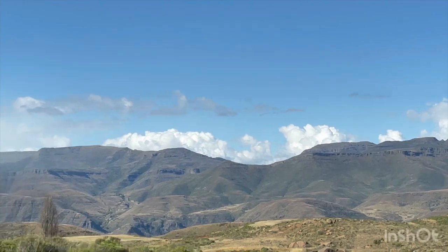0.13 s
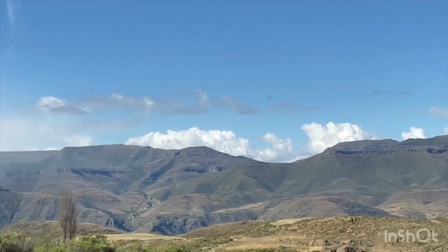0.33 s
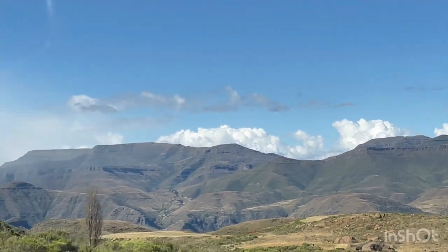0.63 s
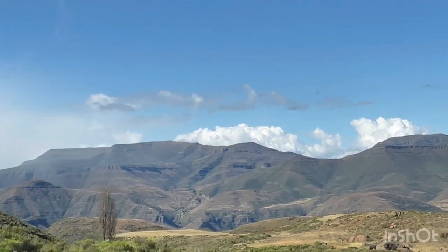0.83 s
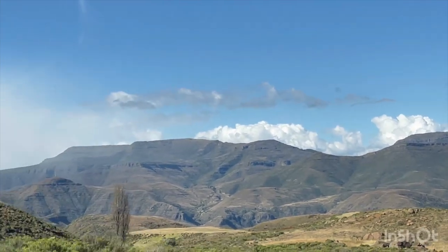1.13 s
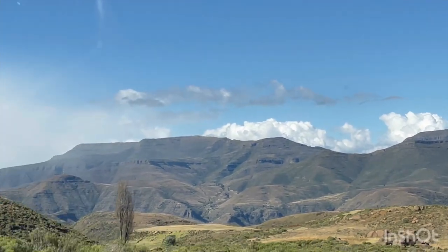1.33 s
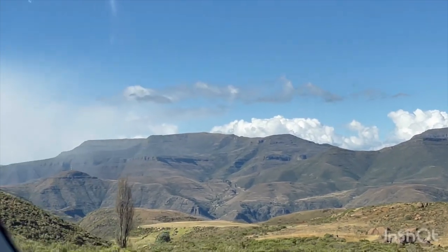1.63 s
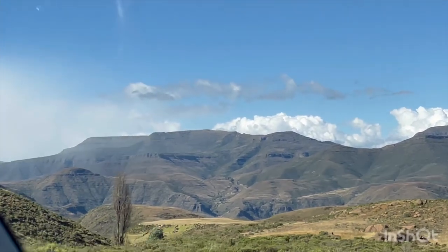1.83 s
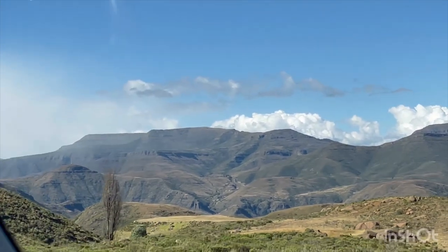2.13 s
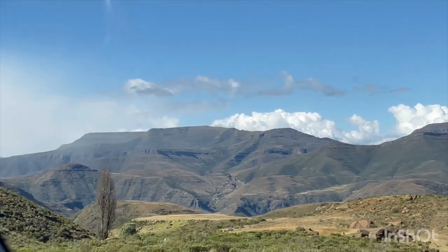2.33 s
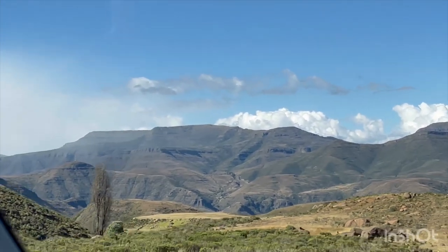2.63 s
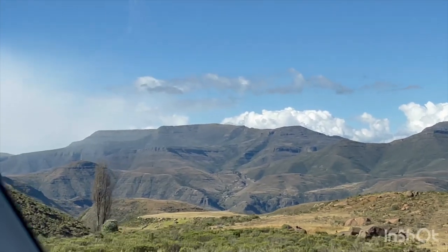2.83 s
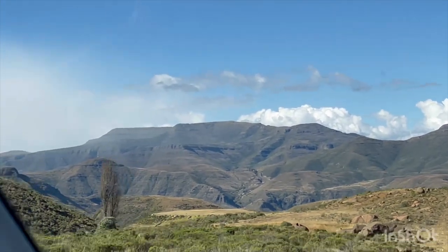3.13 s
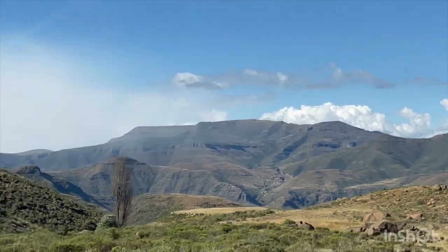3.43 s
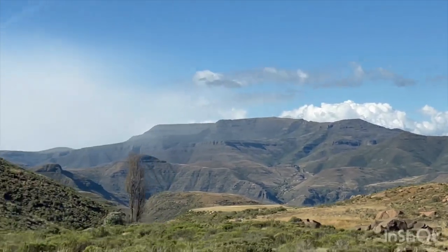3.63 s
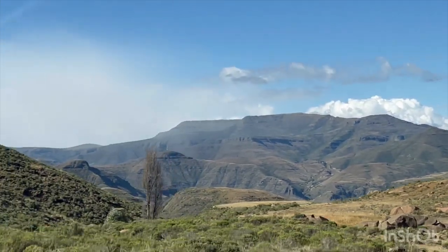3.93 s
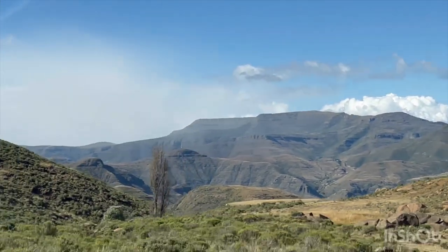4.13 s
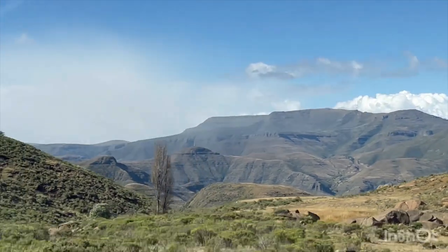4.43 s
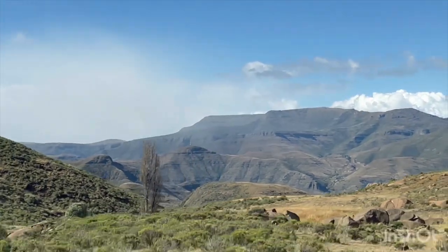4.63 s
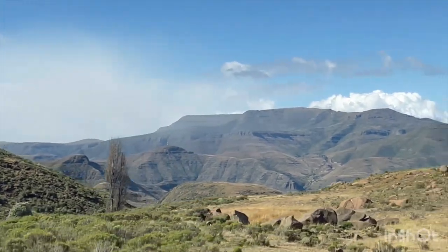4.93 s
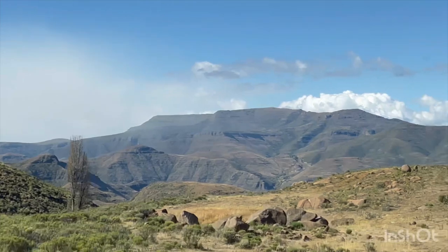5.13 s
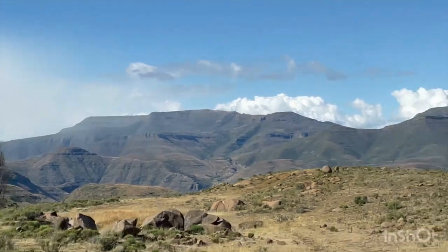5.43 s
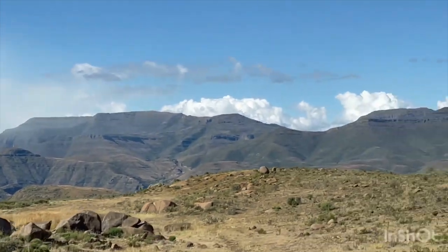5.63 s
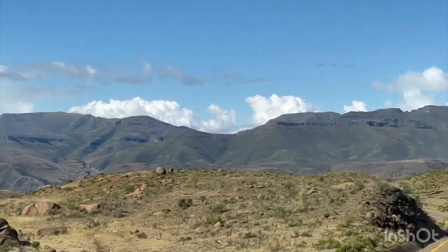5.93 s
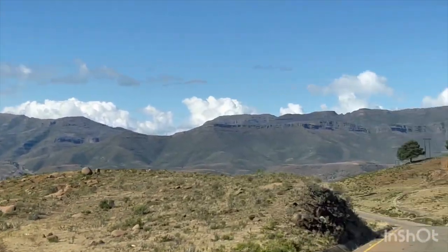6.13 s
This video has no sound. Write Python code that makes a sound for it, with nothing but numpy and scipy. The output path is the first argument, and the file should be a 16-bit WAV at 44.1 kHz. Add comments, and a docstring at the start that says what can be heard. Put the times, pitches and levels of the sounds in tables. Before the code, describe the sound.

Deep throbbing boom, tyre rumble and low droning body panels inside a moving car, with faint cloth rustle early and rougher road towards the end.

```python
"""Inside a car rolling on a tarred road, near a phone. From the start the cabin booms in throbs, body panels and
tyres drone as wandering sines, and tyre rumble and roar with an engine beat come through as shaped noise.
Noise hisses at the window seals beside a thin whine; cloth rustles in a bright and a dull hiss that stop at
2.1 s, and the seat creaks early on. Two ticks ring the phone case after 1.3 s, then come short soft puffs of
noise, each in one band; at 4.2 s something squeaks once. The road turns coarser and louder towards the end."""
import sys
import numpy as np
from scipy import signal
from scipy.fft import rfft, irfft, next_fast_len
from scipy.io import wavfile
from scipy.ndimage import uniform_filter1d, map_coordinates

SR = 44100
rng = np.random.default_rng(int(sys.argv[2]) if len(sys.argv) > 2 else 0)


def file_out(sig):
    """Save sig as 16-bit WAV at sys.argv[1]."""
    # one column per channel
    cols = np.atleast_2d(sig).T
    # limit, then scale
    lim = np.clip(cols, -1, 1)
    pcm = np.round(lim * 32767).astype(np.int16)
    wavfile.write(sys.argv[1], SR, pcm)


N = 276507
TIME = np.arange(N) / SR  # s

# Drive of the road: t/s, rumble level/dB, roar level/dB,
# then ringing of floor/dB, roof/dB, tyre cavity/dB, doors/dB, dash/dB
ROAD_DRIVE = [(0, -30, -44.5, -33, -39, -38.5, -59, -64), (.4, -30, -45, -35, -39, -39.5, -44.5, -62),
              (.93, -30.5, -45, -38, -38, -58, -42, -57.5), (1.45, -29, -44, -27, -38.5, -45.5, -46, -54),
              (1.8, -30, -44.5, -52.5, -38.5, -43, -49.5, -61),
              (2.02, -32.5, -44.5, -48, -38, -43.5, -49, -58), (2.3, -31.5, -46, -52, -36, -48.5, -44, -54),
              (2.75, -31, -46, -43.5, -34.5, -40.5, -48, -63.5),
              (3.2, -29, -46, -32.5, -37, -42, -53.5, -48), (3.55, -30, -46, -33, -35.5, -43.5, -45.5, -57),
              (3.78, -32, -45, -39, -35.5, -35, -50, -50.5),
              (4.05, -29.5, -45, -41.5, -37.5, -43, -42.5, -53),
              (4.22, -29.5, -45.5, -37.5, -38, -41, -32.5, -48.5),
              (4.35, -30, -45, -29.5, -36, -33, -39.5, -47),
              (4.52, -27.5, -45.5, -47.5, -43.5, -48, -46.5, -51.5),
              (4.7, -29, -45, -39, -40.5, -33.5, -39.5, -50),
              (4.9, -24, -43.5, -32, -37, -41.5, -38.5, -49),
              (5.2, -27.5, -43.5, -30.5, -33.5, -36.5, -34.5, -55),
              (5.33, -27.5, -44, -34.5, -32, -27.5, -30, -55.5),
              (5.47, -27, -44.5, -33.5, -31, -41, -37, -51),
              (5.65, -26.5, -44.5, -32, -34.5, -33, -33.5, -54),
              (5.85, -27, -45, -33.5, -33, -37, -43.5, -45.5), (6.05, -26, -44, -37, -39, -33, -41.5, -48),
              (6.27, -28, -45, -30.5, -30.5, -36.5, -49, -44.5)]


def amp(db):
    """dB to gain."""
    return 10 ** (np.asarray(db) / 20)


def unit(x):
    """Scaled to rms 1."""
    return x / np.sqrt(np.mean(x ** 2) + 1e-20)


def along(points, hz):
    """Values between (f/Hz, value) points, read on a log frequency axis."""
    f, v = np.transpose(points)
    return np.interp(np.log(hz + 1), np.log(f + 1), v)


def curves(rows):
    """One value per sample for each column after the time."""
    s, *columns = np.transpose(rows)
    return [np.interp(TIME, s, column) for column in columns]


def wobble(rate):
    """A smooth random curve, rate knots a second."""
    knots = rng.standard_normal(int(N * rate / SR) + 4)
    return map_coordinates(knots, [np.arange(N) * rate / SR])


def swell(s, db, length, peaky=0.58, early=1):
    """A rounded gain that opens at s and closes after length; early under 1 brings its top forward."""
    progress = np.clip((TIME - s) / length, 0, 1)
    return amp(db) * np.sin(np.pi * progress ** early).clip(0) ** peaky


def plateau(s, length, db, edge_s):
    """A gain that rises around s, holds and falls around s + length."""
    t = TIME - s
    edges = np.clip(np.minimum(t, length - t) / edge_s + .5, 0, 1)
    return amp(db) * np.sin(np.pi / 2 * edges) ** 2


def tone(hz):
    """A sine of rms 1 on a moving pitch, from a random phase."""
    return np.sqrt(2) * np.sin(2 * np.pi * (np.cumsum(hz) / SR + rng.random()))


def filtered(x, response, mirror="odd"):
    """x times a response of frequency; mirrored ends keep the edges from ringing."""
    pad = SR // 4
    x = np.pad(x, [(0, 0)] * (x.ndim - 1) + [(pad, pad)], "reflect", reflect_type=mirror)
    index = np.arange(N + 2 * pad)
    x = x * np.clip(np.minimum(index, index[::-1]) / pad, 0, 1)  # fades only the mirrored ends
    m = next_fast_len(N + 2 * pad)
    return irfft(rfft(x, m) * response(np.fft.rfftfreq(m, 1 / SR)), m)[..., pad:pad + N]


def resonant(x, modes, order=1):
    """x through (f/Hz, width/Hz, level/dB) resonances; order 2 deepens the valleys between them."""
    def response(f):
        total = 0
        for k, (centre, width, db) in enumerate(modes):
            damping = 1j * f * width
            peak = damping / (centre * centre - f * f + damping)
            total = total + (-1) ** k * amp(db) * peak ** order
        return total
    return filtered(x, response)


def patchy(patchy_db, size=512, axis=(6, 10)):
    """White noise with patches of random gain; a longer frame size makes them narrower in pitch and slower."""
    z = signal.stft(rng.standard_normal(N + size), nperseg=size)[2]
    field = uniform_filter1d(rng.standard_normal(z.shape), size=axis[0], axis=0)
    field = uniform_filter1d(field, size=axis[1], axis=1)
    return signal.istft(z * amp(patchy_db * unit(field)), nperseg=size)[1][:N]


def rush(source, spectrum):
    """A source coloured by a spectrum, rms 1."""
    return unit(filtered(source, lambda hz: amp(along(spectrum, hz)), mirror="even"))


def wide(make):
    """Two draws of a sound, the second opposite in the channels: a field from all around."""
    # Stereo spread throughout: f/Hz, side minus mid/dB
    width = [(40, -34.5), (60, -23), (110, -20), (200, -11), (380, -10.5), (700, -5), (1300, -6.5),
             (1800, -10.5), (2150, -43.5), (9000, -55)]
    # Extra side noise at 2.5-5 kHz from 2.43 s: f/Hz, side minus mid/dB
    extra_side = [(2000, -47), (2500, -25), (2900, -11.5), (4200, -6.5), (5000, -13), (5400, -63)]
    extra_start_s = 2.43
    mid, other = make(), make()
    extra_gain = np.clip((TIME - extra_start_s) / .08, 0, 1)
    side = filtered(other, lambda hz: amp(along(width, hz)))
    side = side + extra_gain * filtered(other, lambda hz: amp(along(extra_side, hz)))
    return np.array([mid + side, mid - side])


def boom():
    """The cabin's lowest air mode throbs: a sine of wandering pitch swells again and again over a softer boom."""
    # Throbs of the air mode: start t/s, level/dB before random sway, length/s, mean f/Hz at mid-throb
    throb_rows = [(-.02, -22, 0.077, 42.47), (0.169, -21.5, .12, 45.53), (0.269, -24.5, 0.11, 46.12),
                  (0.449, -16.5, 0.39, 45.54), (0.86, -24, .11, 49.71), (0.981, -24.5, 0.09, 49.45),
                  (1.158, -20.5, 0.16, 47.55), (1.297, -16.5, .14, 47.15), (1.446, -16, .22, 46.93),
                  (1.636, -23, 0.23, 46.08), (1.86, -21.5, 0.12, 48.17), (2.071, -23.5, .125, 46.6),
                  (2.209, -20, .11, 46.43), (2.316, -22.5, .25, 46.24), (2.586, -24.5, 0.16, 46.47),
                  (2.704, -17, .11, 45.93), (2.812, -22.5, .16, 45.54), (2.96, -27, .09, 46.04),
                  (3.054, -17.5, 0.3, 45.27), (3.383, -19, .17, 42.23), (3.631, -18, 0.11, 46.29),
                  (3.745, -19, 0.29, 45.83), (4.004, -27.5, 0.089, 47.81), (4.13, -20.5, 0.17, 46.96),
                  (4.298, -20, 0.34, 43.67), (4.576, -13.5, 0.095, 44.55), (4.695, -17.5, 0.32, 45.1),
                  (4.985, -22, 0.065, 45.12), (5.056, -14.5, 0.23, 44.46), (5.317, -22.5, 0.18, 45.6),
                  (5.401, -19, .16, 48.06), (5.561, -19.5, 0.099, 50.2), (5.665, -19.5, 0.071, 48.6),
                  (5.773, -20.5, 0.15, 45.8), (5.883, -16, 0.21, 47), (6.115, -24, .07, 47),
                  (6.216, -19.5, 0.057, 43.9)]
    boom_hz, boom_db, sway_db = 46.04, -37, 2.5  # the boom under the throbs and its random sway
    pitch, = curves([(s + length / 2, hz) for s, db, length, hz in throb_rows])
    throbs = np.zeros(N)
    for k, (s, db, length, hz) in enumerate(throb_rows):
        # each swings against the last, as beats do
        throbs += (-1) ** k * swell(s, db, length, peaky=0.6, early=0.77)
    between = amp(boom_db + sway_db * wobble(19)) * tone(boom_hz + 5 * wobble(24))
    return between + throbs * amp(0.83 * wobble(33)) * tone(pitch + 1.53 * wobble(16))


def panels():
    """Road shake rings the body and tyre modes as sines of wandering pitch and level; bumps lift floor and roof."""
    # Modes grouped as floor, roof, tyre cavity (split in two by the load), doors, dash:
    # f/Hz, random wander/Hz, level/dB relative to the group's ringing
    panel_modes = [
        [(79.77, 2.52, -2.5)],
        [(116.5, 2.2, -1.5)],
        [(190, 2, -2), (203.2, 2.26, -4.5)],
        [(241.7, 5, -3.5)],
        [(428, 12, -3), (470, 12, -6)],
    ]
    # Rough patches: start t/s, length/s, floor level/dB, roof level/dB
    bumps = [(1.303, 0.092, -30.5, -30), (1.776, 0.074, -33, -30), (3.043, 0.15, -27.5, -29),
             (3.563, 0.042, -23, -31), (3.738, 0.16, -39, -27), (3.895, 0.071, -27, -31),
             (4.024, 0.11, -25.5, -43), (4.875, 0.074, -21, -25.5), (4.992, 0.15, -22, -26.5),
             (5.347, 0.15, -29, -28), (5.525, 0.13, -24, -25.5), (5.71, .16, -19.5, -25),
             (5.965, 0.073, -29, -24.5), (6.088, 0.11, -26, -28.5)]
    bump_edge_s, sway_db = 0.029, 1.5
    _, _, floor_db, roof_db, *others_db = curves(ROAD_DRIVE)
    floor, roof = amp(floor_db), amp(roof_db)
    floor_bumps, roof_bumps = np.zeros(N), np.zeros(N)
    for s, length, floor_bump_db, roof_bump_db in bumps:
        floor_bumps += plateau(s, length, floor_bump_db, bump_edge_s)
        roof_bumps += plateau(s, length, roof_bump_db, bump_edge_s)
    gains = [np.maximum(floor, floor_bumps), np.maximum(roof, roof_bumps), *amp(others_db)]
    ringing = np.zeros(N)
    for modes, gain in zip(panel_modes, gains):
        for hz, wander_hz, db in modes:
            sway = sway_db * (wobble(9) + wobble(16))
            ringing += gain * amp(db + sway) * tone(hz + wander_hz * wobble(14))
    return ringing


def drone():
    """The road keeps the cabin air and the panels ringing; the heavy body passes no treble."""
    body_top_hz = 650
    return filtered(boom() + panels(), lambda hz: 1 / (1 + (hz / body_top_hz) ** 8))


def road():
    """Tyres rumble through the floor as patchy noise; the roar above carries the engine's firing beat."""
    # Rumble colour on smooth tar, then on coarser tar: f/Hz, relative level/dB
    rumble_smooth = [(15, -62.5), (24, -8), (34, -12), (46, -10.5), (60, 7.5), (70, 2), (98, 2.5),
                     (130, -1.5), (160, -5.5), (178, -7.5), (204, -9), (232, -14), (255, -11), (275, -10.5),
                     (300, -8.5), (330, -15), (400, -25), (600, -39.5), (2500, -140)]
    rumble_coarse = [(15, -59.5), (24, -8.5), (34, -7.5), (46, -13.5), (60, 9.5), (70, -1.5), (97, 0.5),
                     (107, 0.5), (128, -5.5), (143, -1), (160, -3.5), (180, -5.5), (212, -9.5),
                     (238, -10.5), (258, -6.5), (285, -12), (400, -21.5), (600, -42.5), (2500, -140)]
    # Roar colour on smooth tar, then on coarser tar: f/Hz, relative level/dB
    roar_smooth = [(240, -26.5), (310, -0.5), (345, -2.5), (370, 1.5), (420, -5.5), (460, -5), (480, -10.5),
                   (580, -13.5), (612, -9), (645, -12.5), (680, -8), (722, -16.5), (765, -10.5),
                   (815, -9.5), (850, -10), (880, -10.5), (915, -24), (945, -18.5), (980, -16),
                   (1070, -20.5), (1550, -21.5), (2000, -28), (3400, -35), (6000, -55), (11000, -130)]
    roar_coarse = [(240, -27.5), (360, -10.5), (430, -1), (590, -9), (630, -15.5), (680, -9.5),
                   (760, -13.5), (880, -10), (960, -17), (1150, -17), (1290, -22.5), (1400, -25),
                   (1840, -28.5), (3400, -39), (6000, -59.5), (11000, -130)]
    # Blend towards coarser tar: t/s, share of coarse power (0-1)
    coarse_share = [(0, 0), (3.2, 0.22), (4.8, 0.97), (6.27, 0.79)]
    firing_hz = 69.2  # mean rate
    rumble_db, roar_db, *_ = curves(ROAD_DRIVE)
    coarse = np.clip(curves(coarse_share)[0], 0, 1)
    turns = np.cumsum(firing_hz + 0.63 * wobble(0.81)) / SR
    beat = 1 + 0.051 * np.cos(2 * np.pi * turns) + 0.018 * np.cos(np.pi * turns)  # alternate firings differ

    def shake(spectrum):
        return rush(patchy(patchy_db=2.5, size=4096, axis=(2, 4)), spectrum)

    def tread(spectrum):
        return rush(beat * patchy(patchy_db=1.18, size=2048, axis=(2, 6)), spectrum)

    def blend(make, smooth_spectrum, coarse_spectrum):
        return np.sqrt(1 - coarse) * make(smooth_spectrum) + np.sqrt(coarse) * make(coarse_spectrum)

    rumble = amp(rumble_db) * wide(lambda: blend(shake, rumble_smooth, rumble_coarse))
    roar = amp(roar_db) * wide(lambda: blend(tread, roar_smooth, roar_coarse))
    return rumble + roar


def seals():
    """Air hisses at the window seals as gritty noise; a second band and a thin whine are opposite in the channels."""
    # Hiss colour common to both channels, then opposite in the channels: f/Hz, relative level/dB
    common_colour = [(3000, -28.5), (4300, -6.5), (5000, -6.5), (5300, -20), (6200, -11), (7500, -8.5),
                     (9000, -0.5), (10000, -7), (10500, -19), (11500, -11), (12100, -11.5), (12500, -19.5),
                     (13000, -120)]
    opposite_colour = [(8700, -51), (9000, -15.5), (9600, -0.5), (10200, 4), (10900, -9), (11200, -22.5),
                       (11700, -58), (12500, -120)]
    # Loudness of the common hiss: t/s, level/dB
    hiss = [(0, -73.5), (.45, -80), (1.3, -76.5), (2.02, -80.5), (2.14, -80.5), (2.8, -80), (3.6, -76),
            (4.4, -81), (4.75, -79.5), (5, -77.5), (5.7, -77), (6.27, -78.5)]
    # Thin steady whine: mean f/Hz, level/dB
    whine_hz, whine_db = (10420, -85)
    level_db, = curves(hiss)
    grit = amp(2.2 * np.clip(wobble(60), 0, 2.2))  # brief gritty flares
    common = amp(level_db) * rush(grit * patchy(patchy_db=0.5, size=256, axis=(4, 8)), common_colour)
    # the opposite hiss follows the common one at half its dB swing
    opposite = amp(.5 * level_db - 36) * rush(patchy(patchy_db=2.5), opposite_colour)
    opposite = opposite + amp(whine_db) * tone(whine_hz + 8 * wobble(30))
    return np.array([common + opposite, common - opposite])


def rustle():
    """Cloth slides on the phone: a bright and a duller grainy hiss; quick slips lift mostly the bright one."""
    # Cloth dragging: t/s, bright hiss level/dB before random sway, dull hiss level/dB
    contact = [(0, -73, -70.5), (.3, -76.5, -70), (.45, -77, -73.5), (.62, -73.5, -71.5), (.75, -78, -71.5),
               (.85, -72.5, -68), (1.1, -76, -73.5), (1.17, -70, -66.5), (1.45, -73, -68), (1.56, -79, -71),
               (1.78, -76.5, -72), (2.1, -79.5, -69)]
    # Quick slips: start t/s, level/dB, length/s
    strokes = [(0.24, -78, .04), (1.043, -69.5, 0.031), (1.262, -74, 0.025), (1.66, -62.5, .03),
               (1.964, -69.5, .035)]
    hiss_end_s = 2.1  # the bright and dull hisses stop
    slip_dull_db = -5  # dull hiss of a slip against its bright one
    bright_db, dull_db = curves(contact)
    slips = sum(swell(*row) for row in strokes)

    def grain():
        return amp(0.81 * wobble(150)) * patchy(patchy_db=2.5)

    bright = rush(grain(), [(5000, -56.0), (7000, -1.0), (11000, -4.0), (16000, -2.0)])
    dull = rush(grain(), [(1200, -29.0), (2500, 5), (6000, -4.5), (10000, -14.5), (13000, -39.5)])
    hiss_on = np.clip((hiss_end_s - TIME) / .03, 0, 1)
    bright_gain = amp(bright_db + 1.2 * wobble(25)) + slips
    dull_gain = amp(dull_db) + amp(slip_dull_db) * slips
    return hiss_on * (bright_gain * bright + dull_gain * dull)


def creaks():
    """The seat creaks: noise of fast-swaying level rings the seat's modes under short swells."""
    # Creaks: start t/s, level/dB, length/s
    creak_rows = [(0.127, -58.5, .045), (1.12, -62.5, 0.068), (1.164, -71, 0.12)]
    # Seat modes: f/Hz, width/Hz, relative level/dB
    seat_modes = [(1800, 120, 3.5), (2710, 300, 1), (3680, 230, 2), (4600, 500, -8), (6000, 200, -2)]
    friction = amp(2 * wobble(250)) * rng.standard_normal(N)
    return unit(resonant(friction, seat_modes)) * sum(swell(*row, early=.6) for row in creak_rows)


def ticks():
    """A fingernail's single blows ring the modes of the phone case; a bright blow favours the upper ones."""
    # Blows: t/s, strike level/dB before the make-up gain, brightness/dB
    blows = [(1.3412, -47.5, 4), (1.3489, -43.5, -4.5)]
    # Case modes, five lower then two upper: f/Hz, width/Hz, relative level/dB
    case_modes = [(2940, 480, 4), (4010, 520, -7), (5380, 470, -4), (6290, 400, -6), (8650, 550, -4),
                  (9900, 900, -22), (14500, 2500, -12)]
    dark, bright = np.zeros(N), np.zeros(N)
    for s, db, bright_db in blows:
        dark[round(s * SR)] = amp(db - bright_db)
        bright[round(s * SR)] = amp(db + bright_db)
    softened = np.convolve(dark, np.hanning(5) / 2)[:N]
    lower = resonant(softened, case_modes[:5], order=2)
    upper = resonant(bright, case_modes[5:])
    return amp(22.5) * (lower + upper)  # make-up gain


def puffs():
    """Short soft puffs of noise, each rounded and in one band."""
    # Puffs: start t/s, level/dB before the rounding, length/s, centre f/Hz, width/Hz
    puff_rows = [(1.367, -63, .012, 3300, 800), (2.536, -73, 0.014, 6000, 6950),
                 (2.608, -72, 0.018, 7500, 3000), (2.631, -69, 0.013, 6000, 6000),
                 (2.643, -69, 0.016, 4200, 3500), (2.872, -75, 0.016, 8500, 4000),
                 (2.908, -77, .025, 6500, 4000), (3.152, -72.5, 0.012, 4700, 900),
                 (3.717, -75, 0.017, 10800, 1200), (3.845, -76, .02, 6540, 3000),
                 (5.071, -72, 0.043, 7500, 5020), (5.335, -73.5, 0.015, 8900, 800),
                 (5.384, -77, .012, 7000, 3000), (5.572, -76, .025, 6400, 1600),
                 (5.775, -65, 0.015, 3200, 2000), (5.788, -67.5, .014, 7800, 3500),
                 (5.862, -78, .012, 6300, 1400), (5.884, -75.5, .015, 8450, 3000),
                 (5.934, -63, 0.008, 3300, 1100), (5.961, -61, .009, 3300, 1100),
                 (6.073, -79, 0.013, 6460, 2000), (6.209, -79, .018, 6200, 2000)]
    sound = np.zeros(N)
    t = np.arange(4096) / SR
    f = np.fft.rfftfreq(len(t), 1 / SR)
    for s, db, length, hz, width_hz in puff_rows:
        band = np.exp(-(2 * (f - hz) / width_hz) ** 4)
        noise = unit(irfft(band * rfft(rng.standard_normal(len(t)))))
        puff = noise * np.sin(np.pi * np.clip(t / length, 0, 1))
        start = round(s * SR)
        sound[start:][:len(t)] += amp(db) * puff[:N - start]
    return sound


def squeak():
    """One squeak: a rough sine that holds its pitch for half its length, then falls."""
    # Squeak: start t/s, level/dB before random sway, length/s, mean start f/Hz, mean end f/Hz
    s, db, length, start_hz, end_hz = (4.235, -68.5, .032, 2880, 2600)
    pitch = np.interp(TIME, [s + length / 2, s + length], [start_hz, end_hz])
    return swell(s, db, length) * amp(3 * wobble(200)) * tone(pitch + 60 * wobble(210))


def scene():
    """Everything in the cabin."""
    return drone() + road() + seals() + rustle() + creaks() + ticks() + puffs() + squeak()


def record(dry):
    """The left channel hears a little more below the treble; nothing is kept above the band limit."""
    # Stereo lean before its treble roll-off: f/Hz, left minus right/dB
    lean_points = [(40, 0.46), (200, 1.46), (600, 0.8), (1500, 2)]
    top_hz = 15750

    def response(hz):
        lean_db = along(lean_points, hz) / (1 + (hz / 2100) ** 12)
        return amp(np.outer([.5, -.5], lean_db)) * (hz < top_hz)

    return filtered(dry, response)


dry = scene()
out = record(dry)
file_out(out)
```